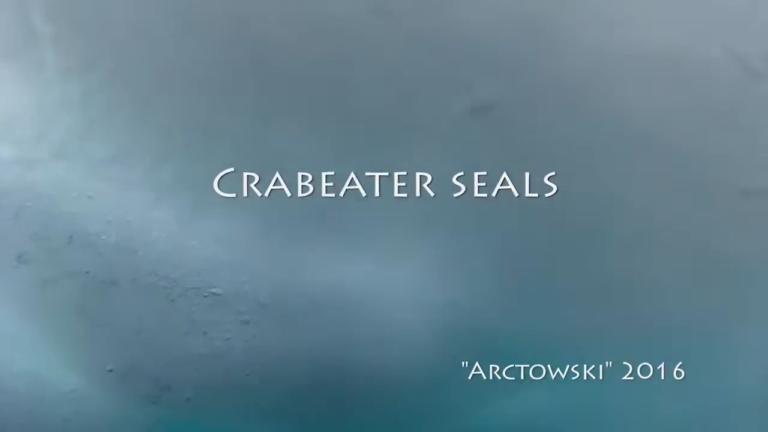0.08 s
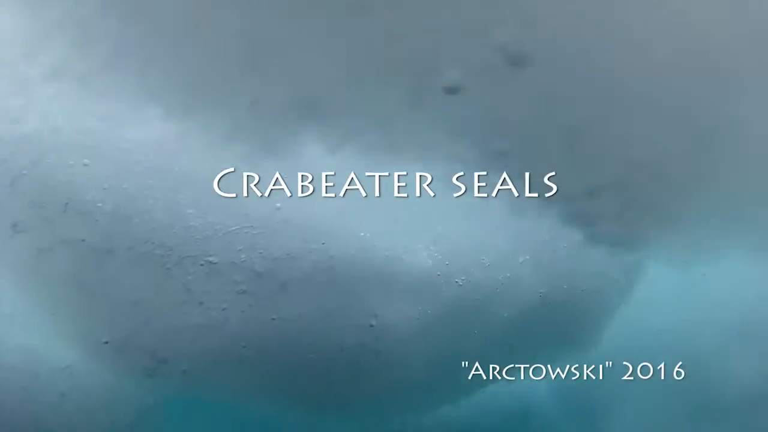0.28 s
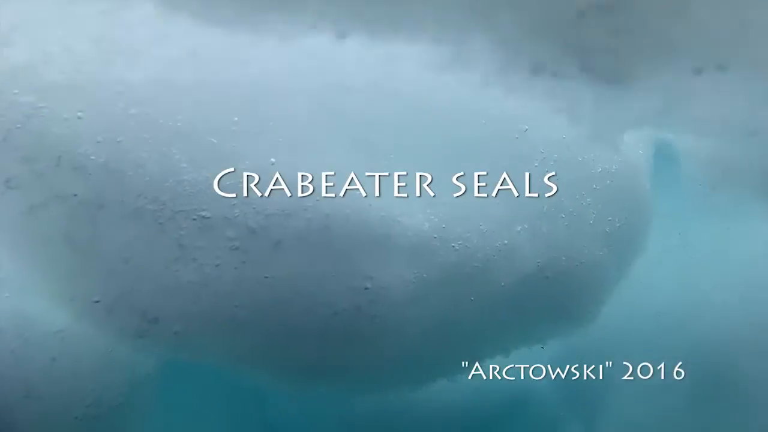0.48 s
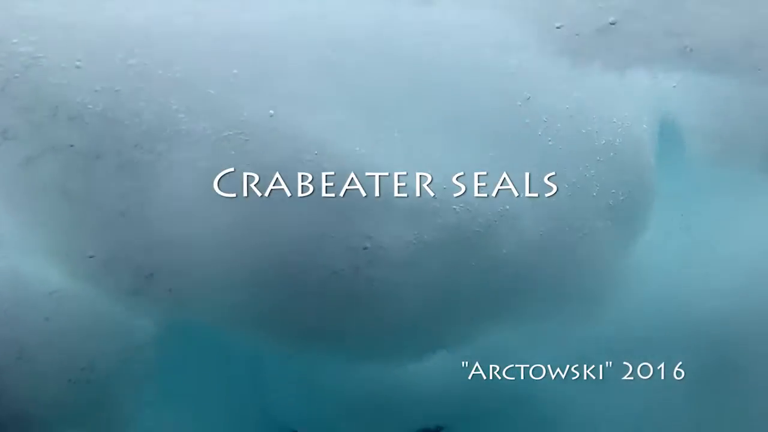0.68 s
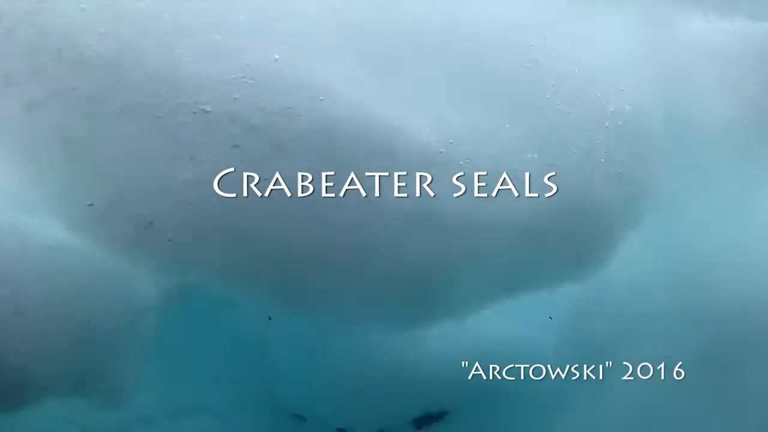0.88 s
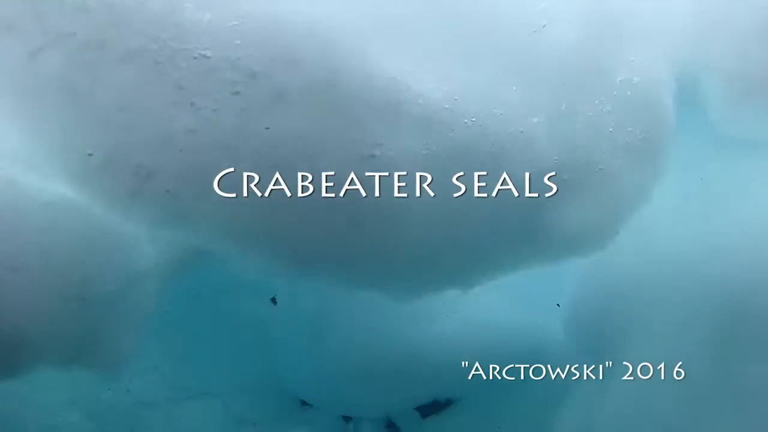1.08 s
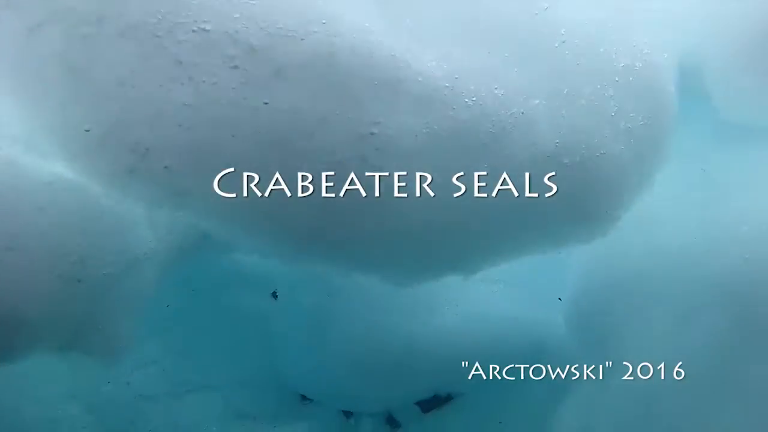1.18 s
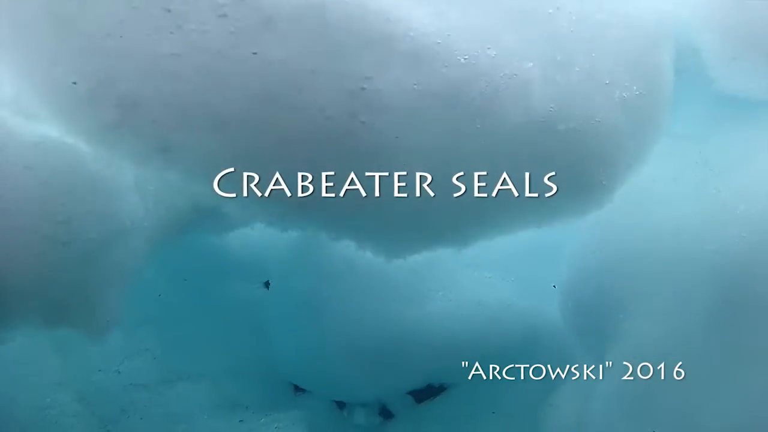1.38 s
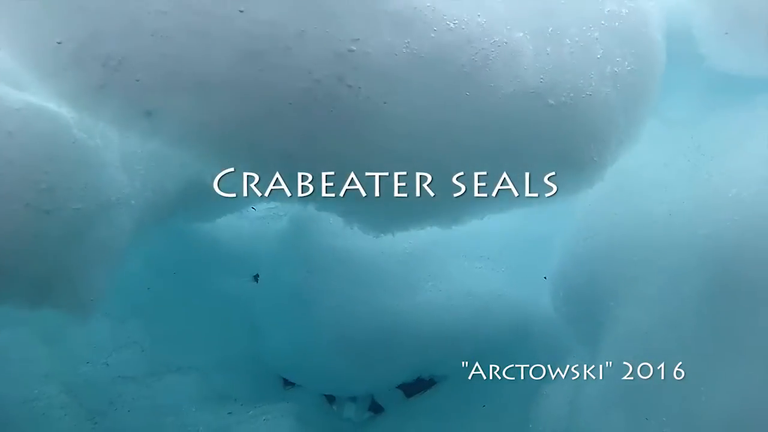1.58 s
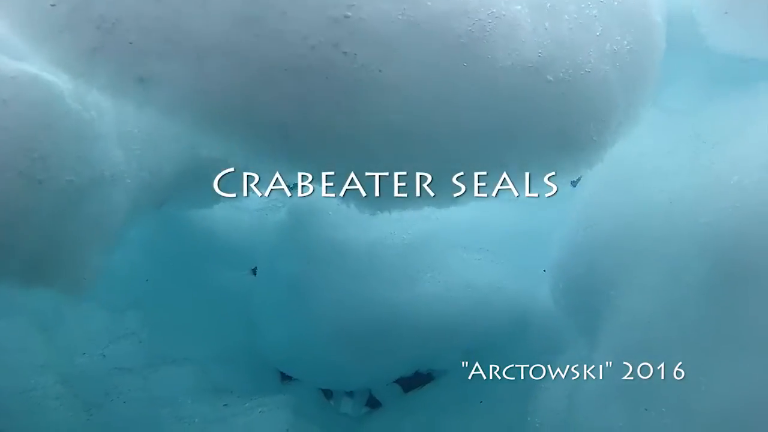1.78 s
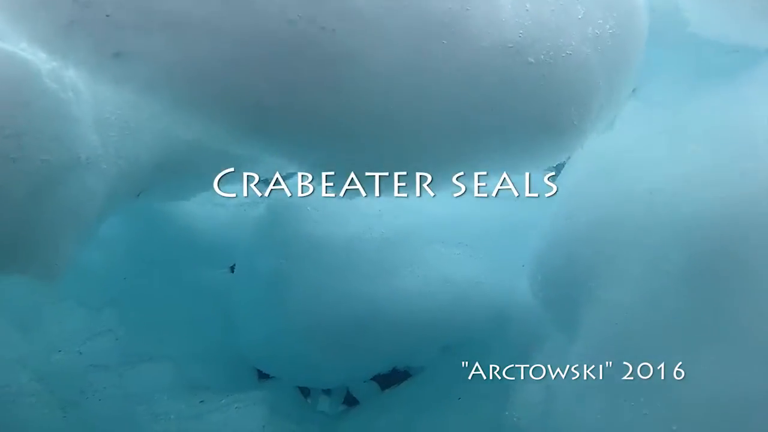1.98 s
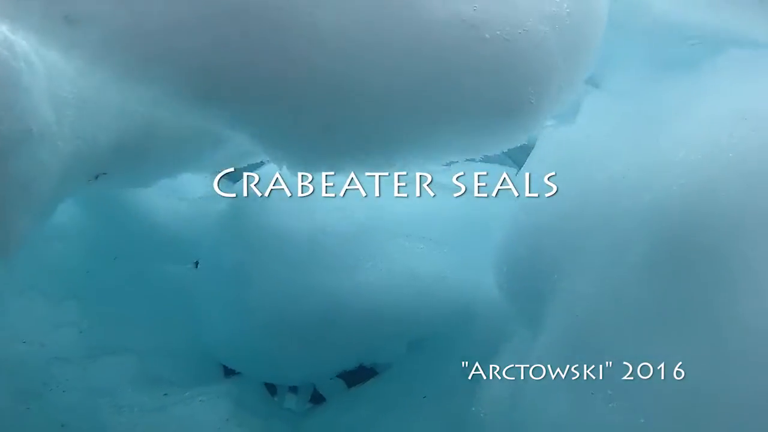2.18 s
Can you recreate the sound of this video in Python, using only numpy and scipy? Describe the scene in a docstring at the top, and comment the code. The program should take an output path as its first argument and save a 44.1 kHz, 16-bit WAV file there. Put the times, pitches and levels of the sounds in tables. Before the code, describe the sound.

Underwater rattling call, perhaps a seal's, with a loud bubble pop, ice cracks and fading knocks

```python
"""A pulsed call, perhaps a seal's, of about sixty pulses a second, amid ice snaps, loosens into single knocks.
Under water near floating ice: two pops, one sharp crack that rings, tiny bubbles that ping over a faint wash.
Pulses, knocks, pops and crack are swelling sine modes; snaps are bursts of band noise; crackle is random clicks.
Wash, rumble and hiss are coloured noise. A closed housing dulls the sound; it is nearly mono,
with a wide rumble fading in."""
import sys
import numpy as np
from scipy import signal
from scipy.fft import irfft
from scipy.io import wavfile
from scipy.ndimage import uniform_filter1d

SR = 44100
rng = np.random.default_rng(int(sys.argv[2]) if len(sys.argv) > 2 else 0)


def unload_wav(signal):
    """Save mono or channel-first audio to the path in sys.argv[1] as 16-bit WAV at rate SR, clipped to [-1, 1]."""
    wavfile.write(
        sys.argv[1],
        SR,
        np.round(np.clip(np.atleast_2d(signal).T, -1, 1) * 32767).astype(np.int16),
    )


N = 97020
TIME = np.arange(N) / SR
SHORT = np.arange(4096) / SR  # time axis of one short event
PULSE_END_S = .93


def amp(db):
    """Decibels to gain."""
    return 10 ** (np.asarray(db) / 20)


def unit(x):
    """Scales to rms 1."""
    return x / np.sqrt(np.mean(x ** 2) + 1e-20)


def curve(points):
    """Joins (time_s, value) points by straight lines."""
    return np.interp(TIME, *np.transpose(points))


def add(mix, start_s, sound):
    """Mixes a sound in at start_s, cut off at the end of the mix."""
    part = mix[max(round(start_s * SR), 0):][:len(sound)]
    part += sound[:len(part)]


def colour(x, points):
    """Causal minimum-phase filter with the given (freq_hz, gain_db) response."""
    point_hz, point_db = np.transpose(points)
    hz = abs(np.fft.fftfreq(len(SHORT), 1 / SR))
    gain_db = np.interp(np.log(hz + 1), np.log(point_hz + 1), point_db)
    log_gain = np.log(amp(gain_db))
    spectrum = np.exp(np.conj(signal.hilbert(log_gain)))
    taps = np.fft.ifft(spectrum).real[:len(SHORT) // 2]
    return signal.fftconvolve(x, taps)[:len(x)]


def swell(rise_s, exponent):
    """Envelope that peaks at 1 after rise_s, then dies away."""
    u = SHORT / rise_s
    return (u * np.exp(1 - u)) ** max(exponent, .1)


def ring(pitch_hz, level_db, rise_s, exponent, glide_share=0):
    """One resonance that swells and dies; its pitch creeps up by glide_share."""
    hz = pitch_hz * (1 + glide_share * (1 - np.exp(-SHORT / rise_s)))
    tone = np.sin(2 * np.pi * np.cumsum(hz) / SR)
    return amp(level_db) * swell(rise_s, exponent) * tone


def burst(level_db, centre_hz, width_octaves, decay_s):
    """A few milliseconds of noise in one band, held for decay_s, then decaying."""
    rise_s = 0.00033
    hz = np.fft.rfftfreq(len(SHORT), 1 / SR)
    band = np.exp(-.5 * (np.log2((hz + 1) / centre_hz) / width_octaves) ** 2)
    grit = irfft(band * np.exp(2j * np.pi * rng.random(len(hz))))
    shape = np.minimum(SHORT / rise_s, 1) * np.exp(-np.maximum(SHORT - decay_s, 0) / decay_s)
    sound = grit * shape
    # equal energy for a given envelope, whatever the random draw
    return amp(level_db) * .5 * sound * np.sqrt(np.sum(shape ** 2) / np.sum(sound ** 2))


def pulse_turns():
    """Number of pulses gone by; one starts at each whole number."""
    # pulse rate of the call: time_s, rate_hz
    pulse_rate = [(0, 64.11), (.03, 63.05), (.12, 59.47), (.2, 61.06), (.3, 61.66), (.37, 60.64),
                  (.44, 58.36), (.54, 60.12), (.585, 58.16), (.67, 58.03), (.75, 55.99), (.9, 57.93)]
    lead_turns = .403
    return np.cumsum(curve(pulse_rate)) / SR + lead_turns


def pulse_throb(lag_turns):
    """Swings between -1 and 1, peaking lag_turns after each pulse; 0 once the pulses end."""
    return np.cos(2 * np.pi * (pulse_turns() - lag_turns)) * (TIME < PULSE_END_S)


def pulsed_call():
    """Regular hollow pulses with some grit, then a few loose knocks."""
    # level of the call: time_s, level_db
    call_level = [(0, -32.5), (.09, -34.5), (.2, -33.5), (.26, -41.5), (.383, -38.5), (.402, -32),
                  (.48, -35), (.62, -31.5), (.72, -33.5), (.885, -38), (.93, -65)]
    # ringing of one pulse before the high-pass: delay_s, pitch_hz, level_db (re call), rise_s, exponent
    pulse_modes = [(0.00024, 638, -1.5, 0.0028, 3.4), (0.00094, 624.6, -19, 0.0083, 5),
                   (0, 1140, -13.5, 0.0042, 4.2), (0.0021, 1493, -21.5, 0.0018, 2.5),
                   (0.0015, 1770, -21, 0.003, 2.1), (0.0011, 280, -25.5, 0.004, 2.2)]
    # loose knocks as the call ends: start_s, level_db, pitch_hz, rise_s
    knocks = [(.9035, -49, 624, .0018), (.9195, -51, 660, 0.0017), (.939, -42.5, 660, 0.0028),
              (.971, -47, 624, 0.0019), (.989, -45.5, 604, .0018), (1.030, -47, 566, 0.0017),
              (1.056, -47, 577, 0.0018), (1.095, -46, 580, 0.002), (1.1715, -39, 570, 0.0011),
              (1.1924, -42, 514, .0012), (1.2155, -41, 540, 0.0013), (1.2394, -39, 645, 0.0023)]
    vary_db, low_cut_hz, knock_exponent = .6, 430, 1.6
    grit_db, grit_hz, grit_delay_s = -21.5, 1450, .003

    out, call_db = np.zeros(N), curve(call_level)
    turns = np.floor(pulse_turns())
    starts = np.flatnonzero((np.diff(turns) > 0) & (TIME[1:] < PULSE_END_S))
    for i in starts:
        for delay_s, pitch_hz, level_db, rise_s, exponent in pulse_modes:
            mode_db = call_db[i] + level_db + vary_db * rng.standard_normal()
            add(out, TIME[i] + delay_s, ring(pitch_hz, mode_db, rise_s, exponent))
        add(out, TIME[i] + grit_delay_s, burst(call_db[i] + grit_db, grit_hz, 0.34, .002))
    out = signal.lfilter(*signal.butter(3, low_cut_hz, "high", fs=SR), out)
    for start_s, level_db, pitch_hz, rise_s in knocks:
        add(out, start_s, ring(pitch_hz, level_db, rise_s, knock_exponent))
    return out


def ice():
    """Snaps, each a burst of dense micro-cracks, over a fine crackle that swells with each pulse."""
    # snaps before the housing: start_s, level_db, centre_hz, width_octaves, decay_s
    snaps = [(.0095, -23.5, 1600, 0.086, 0.0016), (0.0387, -30.5, 2920, 0.66, 0.0014),
             (.0805, -41, 5020, .5, .0014), (0.0908, -31, 2900, 0.65, 0.0011),
             (0.108, -32, 3800, 0.84, 0.00093), (0.1124, -29.5, 2400, 0.52, 0.0014),
             (0.1257, -27.5, 3505, 0.7, 0.0011), (0.134, -37, 2700, .6, 0.0025),
             (0.1435, -42, 4800, 0.5, 0.0013), (0.158, -35.5, 2500, 0.65, 0.00089),
             (.164, -39, 2500, .55, .001), (0.1845, -31.5, 2900, .7, 0.0017),
             (0.1885, -25, 2386, 0.78, 0.002), (0.204, -36, 2600, 0.82, .003),
             (0.2182, -28, 2200, 0.9, 0.0016), (0.2295, -27, 1700, 0.5, 0.0016),
             (0.2369, -25, 2803, 0.73, 0.0014), (0.263, -37, 2620, 0.77, 0.00085),
             (0.313, -47.5, 3300, .6, 0.0017), (0.369, -35.5, 2400, 0.8, 0.0014),
             (.407, -44.5, 3400, .7, .0012), (0.4427, -42.5, 3000, .8, 0.0017),
             (0.4615, -39.5, 2900, .9, .0015), (0.4747, -37, 1900, 2.4, 0.0016),
             (0.4828, -29, 2200, 0.96, 0.0011), (0.5048, -28.5, 2000, 0.84, 0.0032),
             (0.5522, -36.5, 2600, 0.89, 0.0008), (0.5618, -33, 2100, 1.3, 0.002),
             (.652, -40, 1700, .3, 0.0022), (0.671, -40.5, 2740, 0.92, 0.0013),
             (0.752, -41, 1730, 0.66, 0.0044), (0.8034, -39, 1700, 0.74, 0.0043),
             (1.0757, -39.5, 1700, 0.6, 0.0019), (1.1142, -32.5, 1500, 0.53, 0.0011),
             (1.141, -32, 1880, 0.55, 0.0018), (1.1514, -31.5, 1900, 0.56, 0.0024),
             (1.1933, -39, 1700, 0.68, 0.0032), (1.216, -37.5, 1500, 0.35, .0014),
             (1.2875, -38, 3000, 0.54, 0.0021), (1.3315, -40, 3000, 0.44, 0.0018),
             (1.345, -43, 1900, .4, 0.0016), (1.8436, -39, 2110, 0.42, 0.0012),
             (1.9116, -43.5, 2194, .8, .0015), (1.927, -49, 2700, 0.8, 0.0016),
             (1.9934, -35, 3120, 0.77, 0.0014)]
    # fine crackle before the housing: time_s, level_db
    crackle_level = [(0, -54.5), (.2, -52.5), (.27, -74), (.37, -73.5), (.45, -60), (.55, -72),
                     (1.2, -76.5), (1.38, -64), (1.5, -78), (2.2, -74.5)]
    # spectrum of the crackle before the housing: freq_hz, gain_db
    crackle_colour = [(100, -29.5), (700, -9.5), (1500, 1.5), (3000, 2.5), (6000, 2), (12000, -10.5)]
    # what the housing lets through: freq_hz, gain_db
    housing = [(30, -8.5), (300, -4), (550, 5), (2000, -4), (2350, -9), (3000, -3.5), (3500, -9),
               (4000, -18), (6000, -25), (7200, -45), (10000, -35), (13000, -48)]
    clicks_per_s, spread_db = 700, 4
    throb_db, lag_turns = 4, 0.063

    sizes_db = spread_db * np.minimum(rng.exponential(1, N), 4)
    sizes = amp(sizes_db) * rng.choice([-1, 1], N)
    hits = rng.random(N) < clicks_per_s / SR
    clicks = sizes * amp(throb_db * pulse_throb(lag_turns)) * hits
    out = unit(colour(clicks, crackle_colour)) * amp(curve(crackle_level))
    for start_s, *snap in snaps:
        add(out, start_s, burst(*snap))
    return colour(out, housing)


def water():
    """Uneven wash in the resonances of the housing, and a lumpy low rumble."""
    # wash before its throb: time_s, level_db
    wash_level = [(0, -49), (.2, -57), (.28, -58.5), (.38, -59), (.55, -55), (.82, -52.5), (1.05, -55.5),
                  (1.15, -54), (1.27, -57.5), (1.36, -57.5), (1.39, -62), (1.45, -59.5), (1.475, -52.5),
                  (1.55, -60), (1.65, -63.5), (1.91, -64.5), (1.96, -59.5), (2.055, -56.5), (2.11, -63.5),
                  (2.19, -59.5)]
    # spectrum of the wash: freq_hz, gain_db
    wash_colour = [(30, -29), (150, -17.5), (400, -18.5), (490, -12), (580, 8), (750, -6.5), (1020, 1.5),
                   (1200, 0.5), (1420, 3.5), (1950, -3.5), (2350, -9.5), (3200, -10), (3900, -24.5),
                   (5500, -44), (8000, -64)]
    # low water rumble: time_s, level_db
    rumble_level = [(0, -82.5), (.37, -83), (.6, -75), (1, -69), (1.45, -72.5), (1.6, -78.5), (2, -75.5)]
    # spectrum of the rumble: freq_hz, gain_db
    rumble_colour = [(15, -1), (100, -6.5), (190, -0.5), (380, -5), (600, -13.5), (1500, -52)]
    wash_flutter_db, rumble_flutter_db = 2.0, 2
    throb_db, lag_turns = 1, .36

    def uneven_noise(flutter_db, smooth_samples):
        """White noise whose level wanders at random."""
        wander = uniform_filter1d(rng.standard_normal(N), smooth_samples)
        wander = unit(uniform_filter1d(wander, smooth_samples))
        return rng.standard_normal(N) * amp(flutter_db * wander)

    wash = unit(colour(uneven_noise(wash_flutter_db, 260), wash_colour))
    wash_db = curve(wash_level) + throb_db * pulse_throb(lag_turns)
    rumble = unit(colour(uneven_noise(rumble_flutter_db, 1200), rumble_colour))
    return wash * amp(wash_db) + rumble * amp(curve(rumble_level))


def wide_rumble():
    """A soft, even rumble that fades in, in opposite phase at the two ears."""
    # wide rumble: time_s, level_db
    wide_level = [(0, -110), (.3, -100), (.5, -86), (.8, -67.5), (1.1, -59), (1.45, -53.5), (2.2, -49.5)]
    # spectrum of the wide rumble: freq_hz, gain_db
    wide_colour = [(20, -21.5), (45, -24), (110, 7.5), (200, 1), (500, -12.5), (3200, -46.5), (5000, -44),
                   (8000, -52)]
    rumble = unit(colour(rng.standard_normal(N), wide_colour)) * amp(curve(wide_level))
    return rumble * np.array([[1], [-1]])


def pocket():
    """A large air pocket breathes in one tone that glides upward as it dies."""
    level_db, start_hz, glide_share = 0, 644.3, 0.13
    rise_s, decay_s, glide_s = .0026, .00675, .0149
    hz = start_hz * (1 + glide_share * (1 - np.exp(-SHORT / glide_s)))
    shape = (1 - np.exp(-(SHORT / rise_s) ** 2)) * np.exp(-SHORT / decay_s)
    return amp(level_db) * shape * np.sin(2 * np.pi * np.cumsum(hz) / SR)


def bubbles():
    """A large pop with overtones while it overloads, and a small ringing pop; then tiny bubbles ping."""
    # both before the low-pass: delay_s, pitch_hz, level_db, rise_s, exponent, glide_share
    # big_pop: mostly brief overload overtones of the loud pop
    big_pop = [(0.00225, 1949, -12.5, 0.0025, 4.6, 0.0088), (0.002, 3160, -31.5, 0.0024, 3.2, 0),
               (0.0025, 4485, -42.5, .0026, 12, 0.0048), (.0015, 1222, -36, .0045, 0.61, 0.012),
               (.0217, 1750, -33, 0.001, 1, .1)]
    # small_pop: its ringing modes
    small_pop = [(.0002, 601, -28.5, 0.006, 2.3, 0), (.00041, 688, -22.5, 0.0021, 0.76, 0),
                 (-.00024, 1154, -20.5, 0.0018, 1.1, 0), (0, 1470, -27, 0.0014, 1.33, 0),
                 (.0001, 1718, -26.5, 0.0013, 1.34, 0.0045), (0.0034, 936, -34, 0.0036, 0.83, 0),
                 (-.0002, 3170, -44, 0.0016, 0.84, 0.0034)]
    # tiny bubbles: start_s, level_db, pitch_hz
    pings = [(1.5465, -50.5, 3110), (1.562, -48.5, 3120), (1.5691, -46.5, 3210), (1.578, -48.5, 3150),
             (1.591, -46.5, 3116)]
    big_pop_s, small_pop_s, pop_top_hz = .2154, 1.2806, 4500
    ping_rise_s, ping_exponent, splash_db = 0.0015, 1.14, -3

    out = np.zeros(N)
    add(out, big_pop_s + .0005, pocket())
    for start_s, partials in ((big_pop_s, big_pop), (small_pop_s, small_pop)):
        for delay_s, *partial in partials:
            add(out, start_s + delay_s, ring(*partial))
    out = signal.lfilter(*signal.butter(3, pop_top_hz, fs=SR), out)
    for start_s, level_db, pitch_hz in pings:
        ping = ring(pitch_hz, level_db, ping_rise_s, ping_exponent)
        splash = burst(level_db + splash_db, 3330, 0.2, 0.0022)
        add(out, start_s, ping + splash)
    return out


def thuds():
    """Water nudges the housing now and then: soft, low, short resonances."""
    # thuds: start_s, level_db, pitch_hz, rise_s
    thud_list = [(0.386, -70, 60, 0.0081), (1.436, -60, 115, 0.003), (1.889, -63, 85.3, 0.0035)]
    out = np.zeros(N)
    for start_s, level_db, pitch_hz, rise_s in thud_list:
        add(out, start_s, ring(pitch_hz, level_db, rise_s, 0.76))
    return out


def crack():
    """One hard, clean crack that briefly rings the ice in several modes."""
    # modes of the ice: delay_s, pitch_hz, level_db, rise_s, exponent
    crack_modes = [(0.000022, 1389, -27, 0.00134, 1.2), (.00013, 1824, -31.5, 0.0015, 0.76),
                   (0.00057, 2425, -28, 0.00086, 1.3), (0, 2980, -30, 0.0015, 1.13),
                   (0.00031, 3395, -26.5, 0.0011, 3), (.00036, 5600, -48, 0.00057, 5.6),
                   (0, 666, -36, 0.0019, 0.83), (.0003, 9600, -65, 0.00054, 3)]
    crack_s = .5044
    out = np.zeros(N)
    for delay_s, *mode in crack_modes:
        add(out, crack_s + delay_s, ring(*mode))
    return out


def scene():
    """Call, ice, bubbles and wash sit in the centre; the wide rumble spreads around them."""
    centre = pulsed_call() + ice() + water() + bubbles() + thuds() + crack()
    return centre + wide_rumble()


def record(dry):
    """Recorder: separate hiss in each channel, a faint beating whine in both, then the band limit."""
    # hiss before the band limit: time_s, level_db
    hiss_level = [(0, -99), (.6, -94.5), (1.35, -81), (2.2, -80.5)]
    # spectrum of the hiss before the band limit: freq_hz, gain_db
    hiss_colour = [(30, 0), (4000, 2), (7000, 0.7), (12000, -1)]
    whine_hz, whine_db, whine_offset_hz = 10020, -94.5, 37.5
    edge_hz = 12400

    hiss = np.array([unit(colour(rng.standard_normal(N), hiss_colour)) for _ in dry])
    # two lines, whine_offset_hz below and above whine_hz
    whine = np.sin(2 * np.pi * whine_hz * TIME) * np.cos(2 * np.pi * whine_offset_hz * TIME)
    wet = dry + amp(curve(hiss_level)) * hiss + amp(whine_db) * whine
    low_pass = signal.firwin(255, edge_hz, window=("kaiser", 9), fs=SR)
    return signal.oaconvolve(wet, low_pass[None], "same")


dry = scene()
out = record(dry)
unload_wav(out)
```